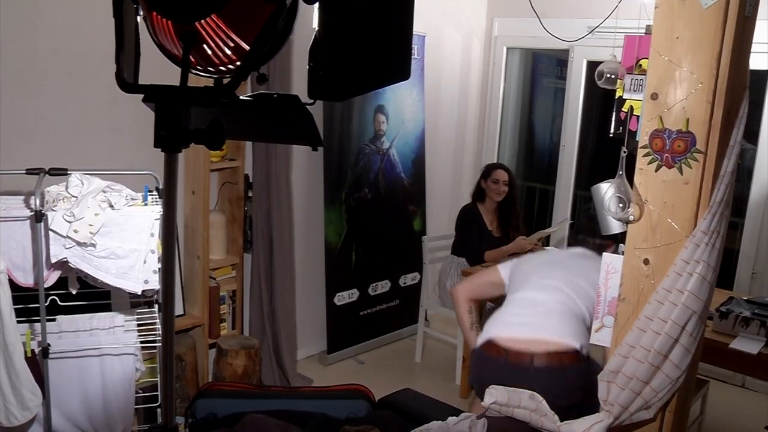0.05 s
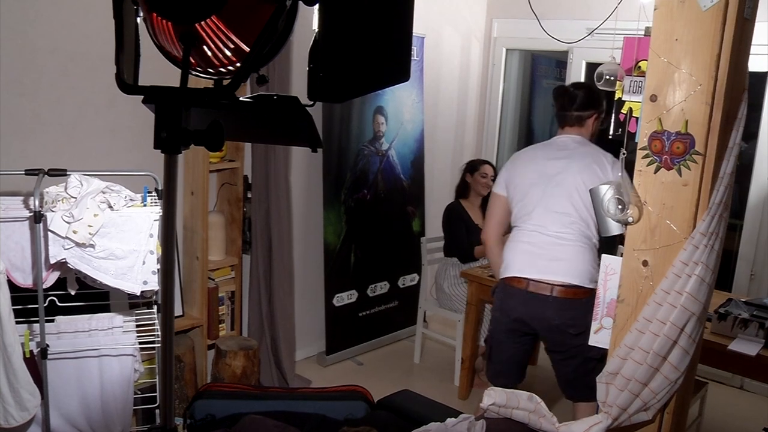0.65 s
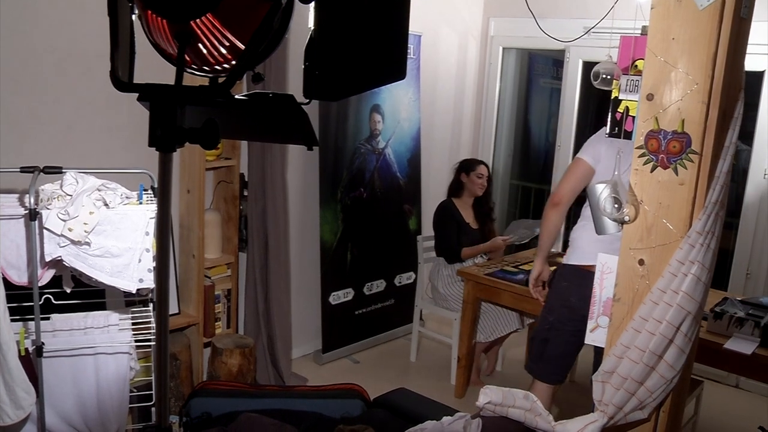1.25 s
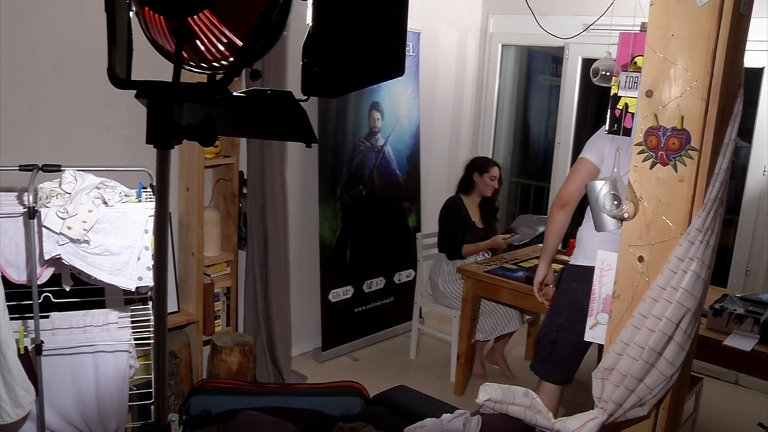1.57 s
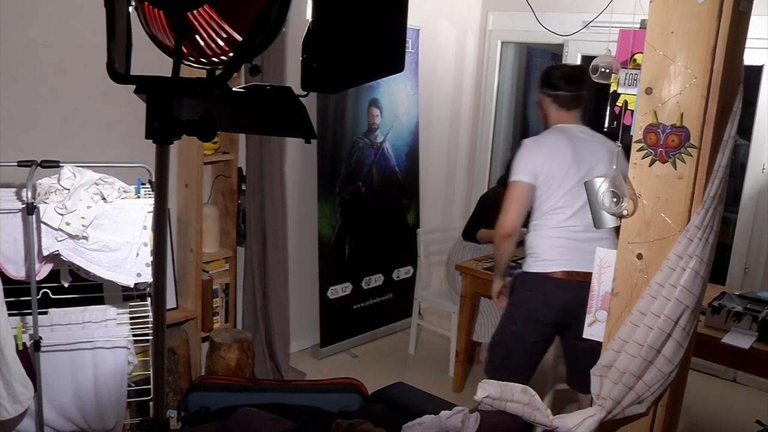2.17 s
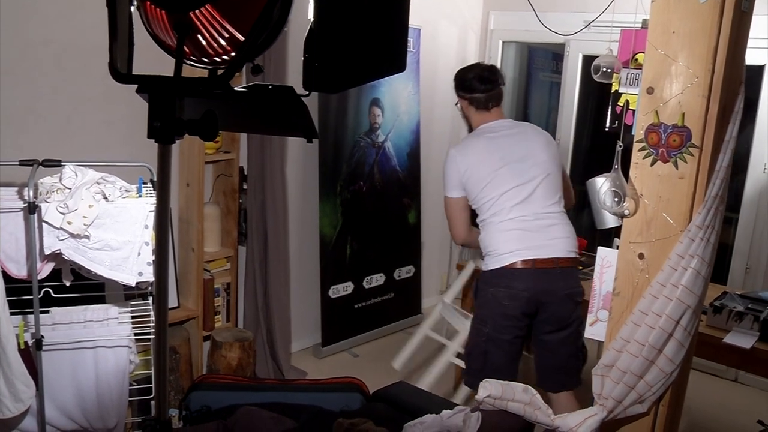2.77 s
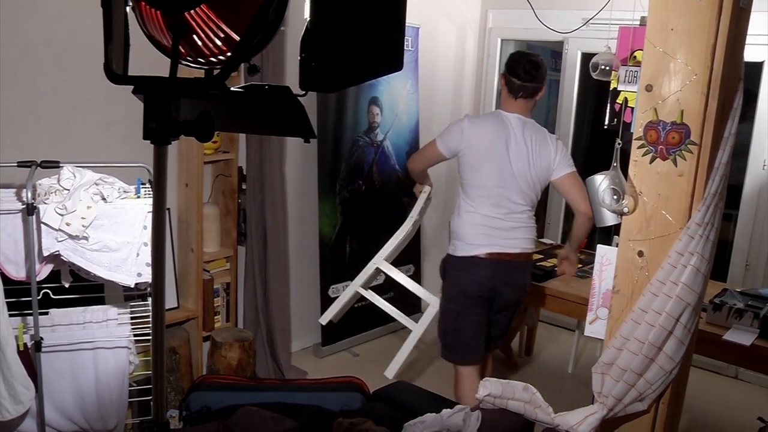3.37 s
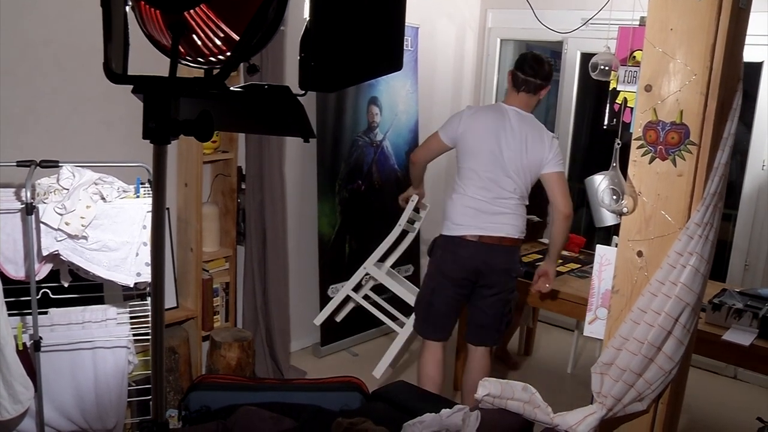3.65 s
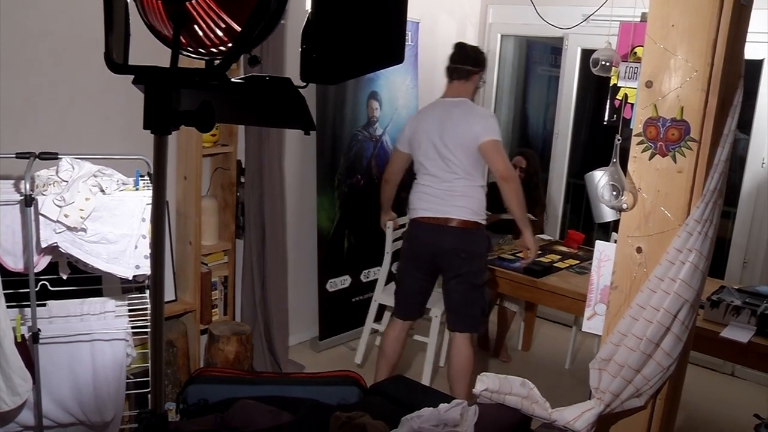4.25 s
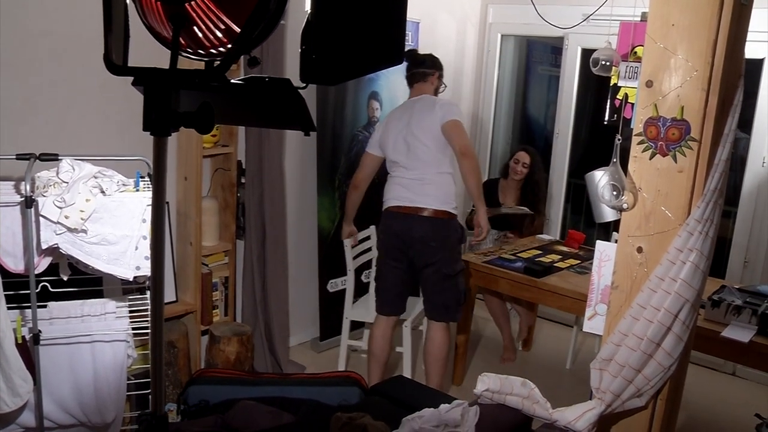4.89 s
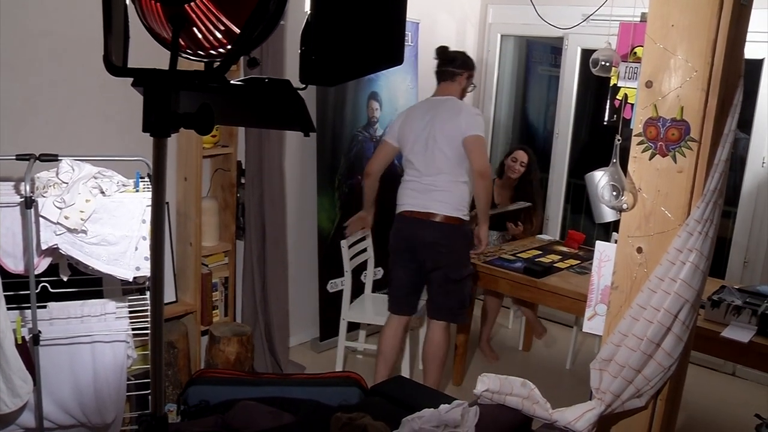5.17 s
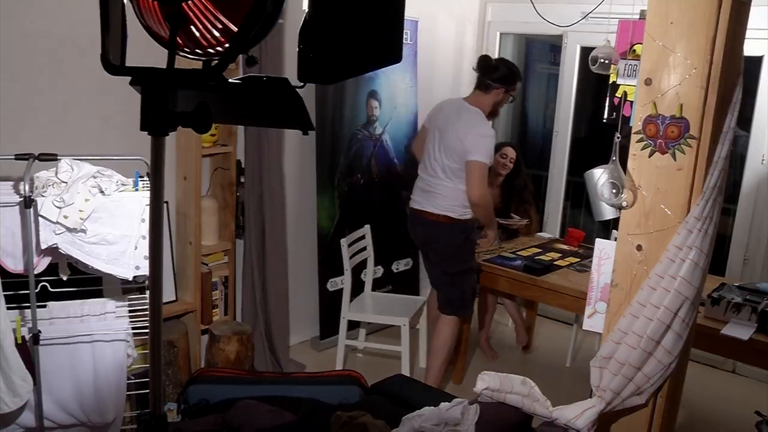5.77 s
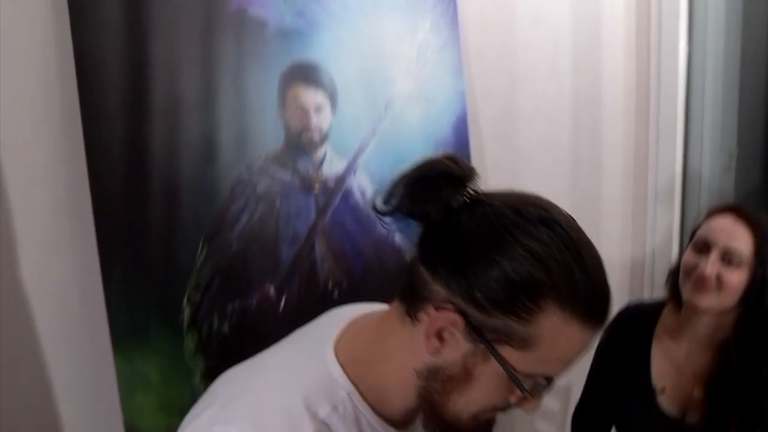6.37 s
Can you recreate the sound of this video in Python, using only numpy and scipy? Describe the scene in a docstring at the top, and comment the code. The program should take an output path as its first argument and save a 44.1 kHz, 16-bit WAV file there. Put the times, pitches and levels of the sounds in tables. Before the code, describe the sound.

Wooden furniture knocks and scrapes in a quiet room as a chair is moved, then two heavier thumps land on a table.

```python
"""Wooden chair and table in a live room.

A chair bumps a table, is dragged, tipped and set down leg by leg; small things clack on the table,
and two heavy knocks land near the end. Each blow is a contact, a short rattle and ringing modes.
Sliding legs, rustling clothes and creaking wood are runs of tiny slips that excite a body.
Faint ticks and close, low bumps come in between, over quiet room air."""
import sys
import numpy as np
from scipy import signal
from scipy.fft import rfft
from scipy.io import wavfile
from scipy.ndimage import uniform_filter1d

SR = 44100
rng = np.random.default_rng(int(sys.argv[2]) if len(sys.argv) > 2 else 0)


def digitize_waveform(pressure):
    """Quantize a signal to 16-bit integers and store it at the path in sys.argv[1].

    Rows of a 2-D input are taken as channels; values are limited to [-1, 1].
    """
    field = np.atleast_2d(pressure).T
    bounded = np.clip(field, -1, 1)
    quanta = np.round(bounded * 32767).astype(np.int16)
    wavfile.write(sys.argv[1], SR, quanta)


N = 292647

# Blows. Each row: start in seconds, mid-band level in dB, then bass, treble and air in dB re mid.
CHAIR_KNOCKS = [(2.156, -43, 2.5, 4, 1.5), (2.297, -55, 9, -9, 0), (2.699, -41.5, 3, -19, -15),
                (2.717, -36, 2.5, -14, -31), (2.759, -39.5, -3, -12, -15), (3.545, -50.5, 3.5, -2, 0.5),
                (3.802, -38, -5.5, -18.5, -24), (4.51, -38, 4.5, -10.5, -19), (4.559, -42.5, 3.5, -12, -14),
                (4.636, -29, 0, -4, -17), (4.838, -41.5, 9.5, -5, -5), (4.856, -27.5, 5, 2, -10.5),
                (4.904, -27.5, -10, -6.5, -14)]
TABLE_THUMPS = [(1.897, -28.5, 1.5, -4, -11), (1.916, -35.5, 1, -12, -15),
                (1.959, -31.5, -4.5, -7.5, -11.5), (6.339, -19, -9.5, -14, -29),
                (6.607, -19.5, -10, -16.5, -29.5)]
SMALL_CLACKS = [(0.345, -53.5, -1.5, 7.5, -13.5), (1.199, -57.5, -13, 11, -9),
                (1.733, -50, -14, 5.5, -14.5), (3.076, -50, -12, 0, -4), (3.087, -42, -20, 0.5, -8),
                (4.313, -52, -4.5, 3, -3), (4.325, -45, -16, 6, -2.5), (5.406, -57, -2, 16.5, 4.5),
                (5.417, -53, -10, 13, 1)]
# Edges of the bass, mid, treble and air bands in Hz.
BAND_EDGES_HZ = [100, 400, 1600, 4500, 12000]
# Ringing modes. Each row: frequency in Hz, relative level in dB, T60 in seconds.
CHAIR_MODES = [(299, -5, 0.62), (555, -7, 0.59), (691, -1, 0.45), (742, -10, 0.6), (845, -2.5, 0.54),
               (884, -5, 0.21), (1039, -1, 0.44), (1350, -21, 0.5), (1520, -2, 0.44), (1580, -23, 0.39),
               (1688, -4, 0.38), (1850, -6, 0.49), (2239, -19, 0.37), (2455, -11, 0.11), (2590, -21, 0.5),
               (2630, -7, 0.33), (2740, -29, 0.45), (3000, -41, 0.22), (3110, -22, 0.32), (3740, -38, 0.23)]
TABLE_MODES = [(213.5, -3, 1.2), (322, -32, 0.46), (580, 3, 0.59), (640, -17, 0.26), (654, -9, 0.48),
               (930, 4, 0.55), (1112, -13, 0.44), (1120, 5, 0.7), (1184, 2, 0.55), (2223, -28, 0.26),
               (2910, -1, 0.25), (3000, -18, 0.24)]
CLACK_MODES = [(722, 8, 0.35), (1138, 2.5, 0.53), (1317, 9, 0.3), (1600, 0, 0.41), (2250, -2, 0.3),
               (3210, 4, 0.44), (3520, 11, 0.16), (4500, -18, 0.22), (6000, -15, 0.14)]
# Sliding legs. Each row: start in seconds, length in seconds, low shudder in dB, high rasp in dB.
LEG_DRAGS = [(1.805, .075, -44, -57), (2.05, 0.067, -44, -47.5), (2.25, 0.17, -46.5, -49),
             (2.42, 0.25, -55, -47), (2.89, 0.1, -51.5, -54), (3.56, 0.44, -55, -47),
             (3.74, 0.12, -48.5, -44)]
# Moving clothes. Each row: start in seconds, length in seconds, low flap in dB, high hiss in dB.
CLOTH_RUSTLES = [(-.01, .12, -52, -57.5), (0.35, 0.18, -57.5, -58), (0.59, 0.19, -57.5, -58),
                 (0.74, 0.17, -53.5, -55), (.94, 0.1, -57.5, -58.5), (1.27, 0.14, -55, -50),
                 (1.43, 0.076, -55.5, -54.5), (3.34, .06, -64, -58), (4.04, 0.18, -71, -62),
                 (5.2, 0.2, -62, -59.5), (5.54, 0.23, -60.5, -59.5), (5.83, .05, -56, -55),
                 (5.94, 0.14, -57.5, -55), (6.14, 0.16, -58.5, -61)]
# Wood under load. Each row: start in seconds, length in seconds, pitch in Hz, level in dB.
WOOD_CREAKS = [(0.608, 0.066, 1580, -50.5), (1.275, 0.087, 1710, -51), (1.735, 0.039, 1460, -42.5),
               (3.237, 0.041, 1420, -55), (3.238, 0.025, 2300, -56), (3.789, 0.038, 1000, -40.5),
               (5.408, 0.036, 2300, -44.5), (5.531, 0.026, 1120, -49)]
# Dry ticks. Each row: start in seconds, peak in dB, pitch in Hz.
DRY_TICKS = [(0.638, -45, 1690), (0.765, -42.5, 4200), (.992, -44, 8900), (1.008, -41.5, 9500),
             (1.983, -35, 5500), (2.394, -44.5, 10500), (5.152, -54, 13000), (5.696, -32.5, 2570),
             (5.868, -43, 4900), (6.546, -54, 7500)]
# Close bumps. Each row: peak time in seconds, peak in dB, pitch in Hz, relative sway gain from 0 to 1.
LOW_BUMPS = [(3.089, -43.5, 35, 0.5), (4.33, -45, 37, 1), (5.416, -44, 42, 1), (5.703, -43, 44, .2),
             (5.803, -45, 62, 0.2), (5.855, -44, 52, 0), (5.883, -47, 40, 0), (6.293, -38, 55.4, 0.1)]
# Broad spectra of the sources. Each row: frequency in Hz, relative gain in dB.
CHAIR_SPECTRUM = [(41, -30), (70, -25), (128, -4), (157, -11.5), (252, -3), (377, -10.5), (441, -4),
                  (483, -9.5), (847, -2.5), (1240, -8), (1520, -6.5), (1620, -6), (3730, -19), (15000, -68)]
TABLE_SPECTRUM = [(41, -48), (70, -18), (117, -10), (180, -7.5), (220, 0.5), (301, -7.5), (345, 0.5),
                  (395, -3.5), (692, -4), (866, -6.5), (947, -2.5), (1210, -5), (3050, -6.5),
                  (15000, -56.5)]
CLACK_SPECTRUM = [(59, -56), (100, -16), (222, 2.5), (582, -6.5), (718, 0), (797, 0.5), (1190, -2),
                  (2320, -11.5), (2750, -11.5), (3460, -6.5), (3920, -7), (6480, -1.5), (15000, -21.5)]
DRAG_SPECTRUM = [(41, -46), (70, -8.5), (206, 5), (505, -5.5), (605, -12), (707, -9.5), (809, -18.5),
                 (947, -15), (1300, -16), (4880, -26), (15000, -45.5)]
CLOTH_SPECTRUM = [(53, -41), (90, -10), (286, 2.5), (325, -7), (555, 1.5), (618, -1.5), (765, -2),
                  (1060, -2), (1620, 1.5), (2050, 0), (5720, -4.5), (15000, -27)]
AIR_SPECTRUM = [(12, -25), (20, 1), (36, -12.5), (92, -17.5), (259, -16), (372, -21.5), (725, -19.5),
                (1380, -35.5), (1670, -28.5), (3080, -24), (15500, -35)]
# Room decay. Each row: frequency in Hz, T60 in seconds.
ROOM_T60 = [(100, 0.38), (260, 0.55), (700, 0.44), (1840, 0.45), (4850, 0.45), (12000, 0.37)]


def blows(rows, spectrum, modes, low_cut_hz, ring_db, contact_db, rattle_gain, rattle_s, floor_db):
    """One contact and a dying rattle per blow; the object rings, the room fills, the floor shakes."""
    out, t = np.zeros(N), np.arange(SR) / SR
    # The deep bass of each knock is cut away below low_cut_hz.
    low_cut = signal.butter(6, low_cut_hz, "highpass", fs=SR, output="sos")
    floor_band = signal.butter(2, [25, 65], "bandpass", fs=SR, output="sos")
    rattle_power = np.exp(-t / rattle_s)
    for start_s, mid_db, bass_db, treble_db, air_db in rows:
        contacts = rattle_gain / 2 * impulses(per_s=500) * np.sqrt(rattle_power)
        contacts[0] = 1
        reflections = room(direct_db=-40, build_s=0.001) * np.sqrt(1 - 0.75 * rattle_power)
        knock = colour(amp(contact_db) * contacts + reflections, spectrum)
        knock = signal.sosfilt(low_cut, knock)
        blow = knock / np.linalg.norm(knock) + amp(ring_db) * ring(modes)
        add(out, start_s, set_bands(blow, mid_db + np.array([bass_db, 0, treble_db, air_db])))
        thud = signal.sosfilt(floor_band, rng.standard_normal(SR) * np.exp(-t / 0.066))
        add(out, start_s, amp(mid_db + bass_db + floor_db) * thud / abs(thud).max())
    return out


def ring(modes):
    """Damped modes of a struck object, swelling over a few milliseconds; unit energy."""
    t = np.arange(SR) / SR
    tone = sum(amp(db - 60 * t / t60_s) * np.sin(2 * np.pi * (hz * t + rng.random()))
               for hz, db, t60_s in modes)
    tone *= 1 - np.exp(-t / 0.0039)
    return tone / np.linalg.norm(tone)


def set_bands(blow, levels_db, onset_samples=2048):
    """Filters a blow toward its onset level in each band: where and how hard it lands."""
    power = 2 * abs(rfft(blow[:onset_samples]) / onset_samples) ** 2
    hz = np.fft.rfftfreq(onset_samples, 1 / SR)
    gains = []
    for low_hz, high_hz, target_db in zip(BAND_EDGES_HZ, BAND_EDGES_HZ[1:], levels_db):
        band_db = 10 * np.log10(power[(hz >= low_hz) & (hz < high_hz)].sum())
        gains.append((np.sqrt(low_hz * high_hz), target_db - band_db))
    return colour(blow, gains)


def friction(strokes, spectrum, attack_s, release_db_per_s, split_hz, slips_per_s, spread_db):
    """Tiny uneven slips excite a body in the room; each stroke sets a low and a high band level."""
    sizes = amp(spread_db * np.minimum(rng.exponential(1, N), 4)) * rng.choice([-1, 1], N)
    slips = sizes * (rng.random(N) < slips_per_s / SR)
    rub = colour(signal.fftconvolve(slips, room(direct_db=-9, build_s=0.011))[:N], spectrum)
    envelopes = np.array([stroke(start_s, length_s, attack_s, release_db_per_s)
                          for start_s, length_s, *_ in strokes])
    out = np.zeros(N)
    for side, levels_db in zip(["lowpass", "highpass"], np.transpose(strokes)[2:]):
        band = signal.sosfilt(signal.butter(3, split_hz, side, fs=SR, output="sos"), rub)
        running_rms = np.sqrt(abs(uniform_filter1d(band ** 2, size=4000)) + 1e-12)
        out += band / running_rms * (amp(levels_db)[:, None] * envelopes).max(axis=0)
    return out


def stroke(start_s, length_s, attack_s, release_db_per_s):
    """Envelope of one movement: rise, hold, decay."""
    t = np.arange(N) / SR - start_s
    return np.clip(t / attack_s, 0, 1) * amp(-release_db_per_s * np.maximum(t - length_s, 0))


def creaks(slips_per_s, width_hz, octave_db):
    """A brief run of slips rings a wood resonance and its weaker octave."""
    out, t = np.zeros(N), np.arange(SR // 8) / SR
    for start_s, length_s, hz, db in WOOD_CREAKS:
        slips = impulses(slips_per_s)[:round(length_s * SR)]
        phase = 2 * np.pi * hz * t
        wood = np.exp(-np.pi * width_hz * t) * (np.sin(phase) + amp(octave_db) * np.sin(2 * phase))
        creak = signal.fftconvolve(signal.fftconvolve(slips, wood), room(direct_db=-2, build_s=0.004))
        add(out, start_s, amp(db) * creak / creak[:len(slips) + len(t) // 4].std())
    return out


def ticks(decay_s, direct_db):
    """Short, nearly dry snaps, each a broad noise band round its pitch."""
    out, t = np.zeros(N), np.arange(SR) / SR
    for start_s, peak_db, hz in DRY_TICKS:
        burst = rng.standard_normal(SR) * np.exp(-t / decay_s)
        snap = colour(burst, [(hz / 4, -24), (hz * 0.89, 0), (hz * 2.17, -14), (hz * 6, -48)])
        snap = signal.fftconvolve(snap, room(direct_db, build_s=0.0059))[:SR]
        add(out, start_s, amp(peak_db) * snap / abs(snap).max())
    return out


def bumps(rise_cycles, sway_delay_s, sway_hz, sway_rise_s):
    """Soft pushes of a cycle or two of deep bass; a slower sway follows some."""
    out, t = np.zeros(N), np.arange(SR // 4) / SR
    for bump_s, peak_db, bump_hz, sway_gain in LOW_BUMPS:
        push = (bump_s, 1, bump_hz, rise_cycles / bump_hz)
        sway = (bump_s + sway_delay_s, sway_gain, sway_hz, sway_rise_s)
        for peak_s, gain, hz, rise_s in (push, sway):
            envelope = gain * amp(peak_db) * (t / rise_s * np.exp(1 - t / rise_s)) ** 2
            add(out, peak_s - rise_s, envelope * np.cos(2 * np.pi * hz * (t - rise_s)))
    return out


def room_boom(hz, gain_db, t60_s, rise_s):
    """A low standing wave, driven by the bass of the chair and table blows."""
    power, t = np.zeros(N), np.arange(SR) / SR
    for start_s, mid_db, bass_db, *_ in [*CHAIR_KNOCKS, *TABLE_THUMPS]:
        envelope = amp(mid_db + bass_db + gain_db - 60 * t / t60_s) * (1 - np.exp(-t / rise_s))
        add(power, start_s, envelope ** 2)
    return np.sqrt(power) * np.sin(2 * np.pi * hz * np.arange(N) / SR)


def room(direct_db, build_s):
    """1 s impulse response: direct sound, then reflections that build up and die by band."""
    t = np.arange(SR) / SR
    hz, frame_s, bins = signal.stft(rng.choice([-1., 1.], SR), SR, nperseg=256)
    decay = amp(-60 * frame_s / log_interp(ROOM_T60, hz)[:, None])
    response = signal.istft(bins * decay, SR)[1][:SR]
    response *= 1 - np.exp(-t / build_s)
    response /= np.linalg.norm(response)
    response[0] += amp(direct_db)
    return response


def room_air(rms_db):
    """Steady background noise, strongest in the deep bass."""
    noise = colour(rng.standard_normal(N), AIR_SPECTRUM)
    return amp(rms_db) * noise / np.sqrt(np.mean(noise ** 2))


def impulses(per_s):
    """1 s of impulses, random in time and size."""
    return rng.standard_normal(SR) * (rng.random(SR) < per_s / SR)


def colour(x, spectrum, size=4096):
    """Minimum-phase filter from (Hz, dB) points."""
    log_gain = np.log(amp(log_interp(spectrum, abs(np.fft.fftfreq(size, 1 / SR)))))
    taps = np.fft.ifft(np.exp(np.conj(signal.hilbert(log_gain)))).real
    return signal.fftconvolve(x, taps[:size // 2])[:len(x)]


def log_interp(points, hz):
    """Table lookup on a log-frequency axis."""
    points_hz, values = np.transpose(points)
    return np.interp(np.log(hz + 1), np.log(points_hz + 1), values)


def amp(db):
    """Decibels to gain."""
    return 10 ** (np.asarray(db) / 20)


def add(mix, start_s, sound):
    """Mixes a sound in at start_s."""
    part = mix[max(round(start_s * SR), 0):][:len(sound)]
    part += sound[:len(part)]


def scene():
    """Mono sum of furniture, clothes, close sounds and room."""
    chair = blows(CHAIR_KNOCKS, CHAIR_SPECTRUM, CHAIR_MODES, low_cut_hz=111, ring_db=-7,
                  contact_db=-15, rattle_gain=0.68, rattle_s=0.0073, floor_db=-14)
    table = blows(TABLE_THUMPS, TABLE_SPECTRUM, TABLE_MODES, low_cut_hz=142, ring_db=-10,
                  contact_db=-21, rattle_gain=1, rattle_s=0.0094, floor_db=-16)
    clacks = blows(SMALL_CLACKS, CLACK_SPECTRUM, CLACK_MODES, low_cut_hz=134, ring_db=-14,
                   contact_db=-15, rattle_gain=0.78, rattle_s=0.005, floor_db=-4)
    drag = friction(LEG_DRAGS, DRAG_SPECTRUM, attack_s=0.026, release_db_per_s=87,
                    split_hz=600, slips_per_s=250, spread_db=5)
    cloth = friction(CLOTH_RUSTLES, CLOTH_SPECTRUM, attack_s=0.05, release_db_per_s=80,
                     split_hz=1290, slips_per_s=560, spread_db=5.5)
    wood = creaks(slips_per_s=700, width_hz=220, octave_db=-34)
    near = ticks(decay_s=0.01, direct_db=8)
    near += bumps(rise_cycles=0.28, sway_delay_s=0.0734, sway_hz=23.6, sway_rise_s=0.056)
    boom = room_boom(hz=131, gain_db=-7.5, t60_s=0.8, rise_s=0.013)
    air = room_air(rms_db=-63)
    return (chair + table + clacks + drag + cloth + wood + near + boom + air)[None]


def record(dry, cutoff_hz=15900):
    """Steep low-pass band limit."""
    taps = signal.firwin(511, cutoff_hz, window=("kaiser", 9), fs=SR)
    return signal.oaconvolve(dry, taps[None], "same")


dry = scene()
out = record(dry)
digitize_waveform(out)
```